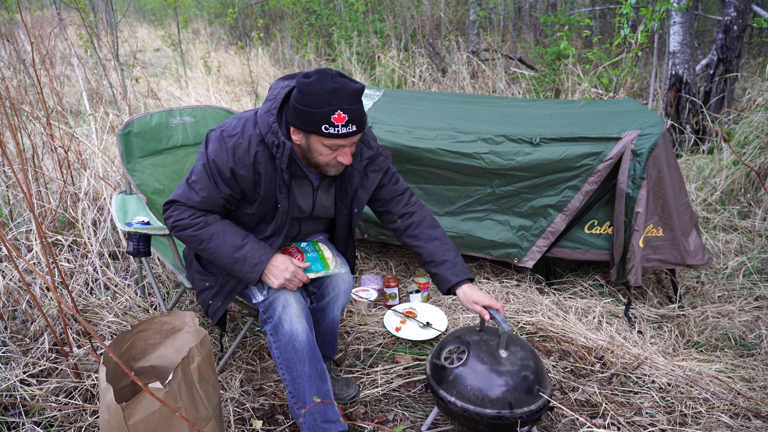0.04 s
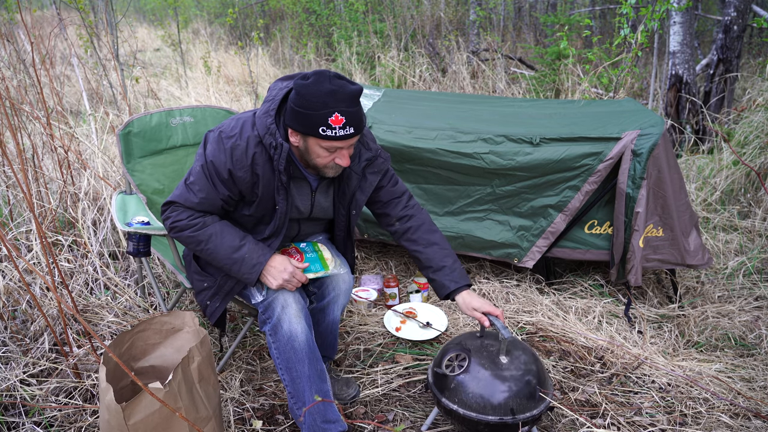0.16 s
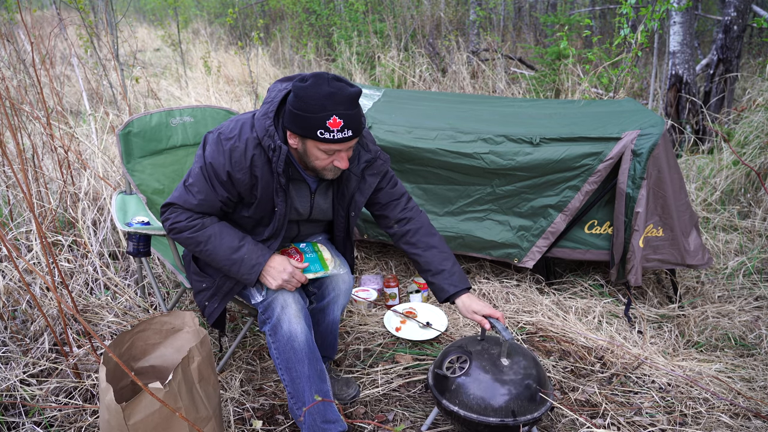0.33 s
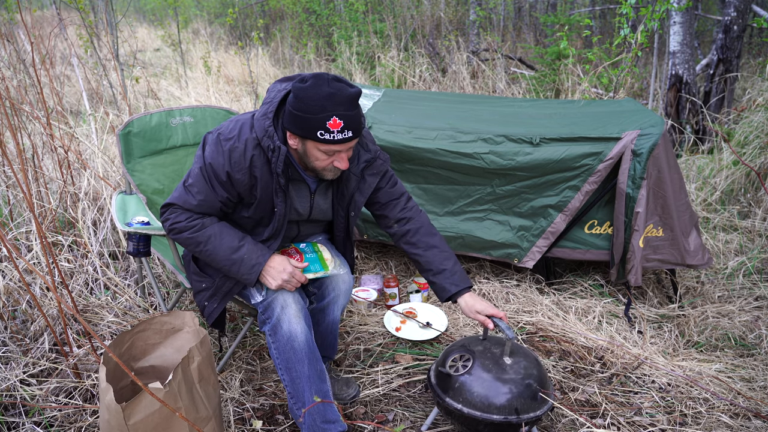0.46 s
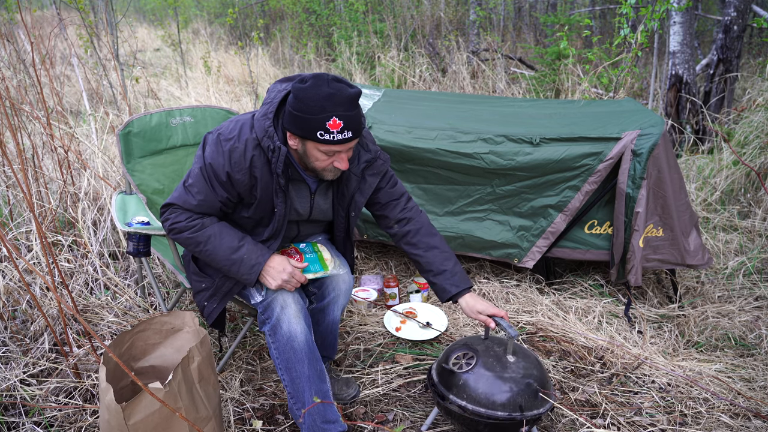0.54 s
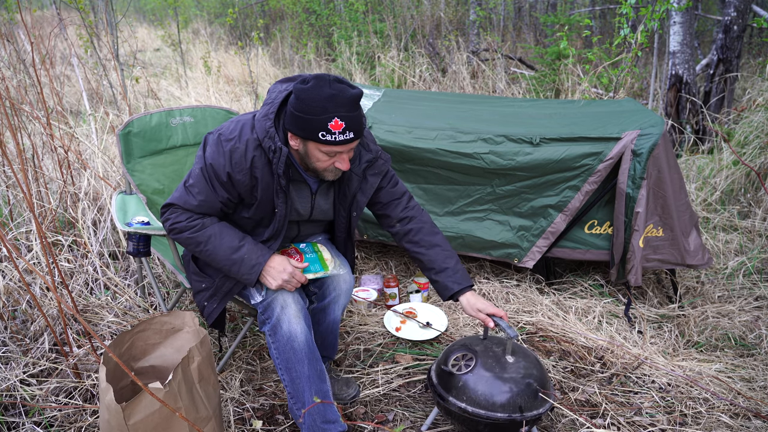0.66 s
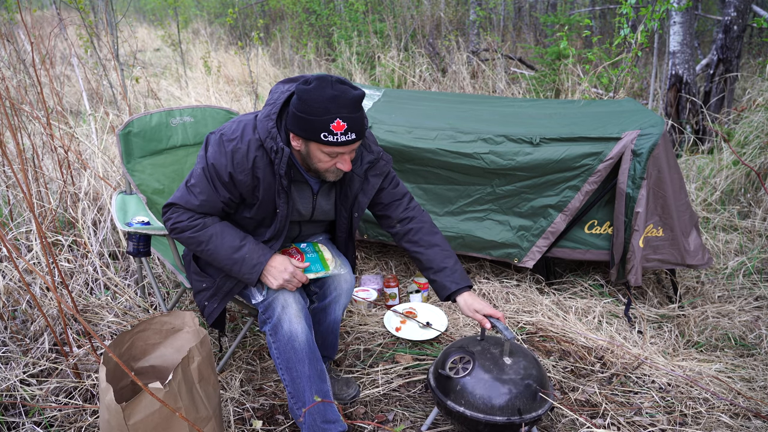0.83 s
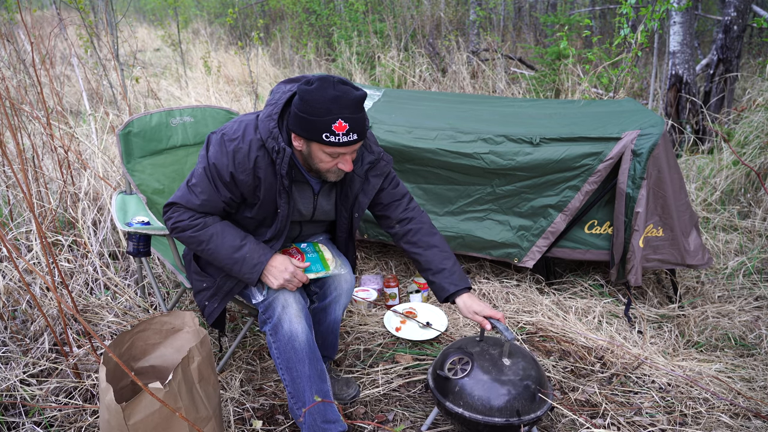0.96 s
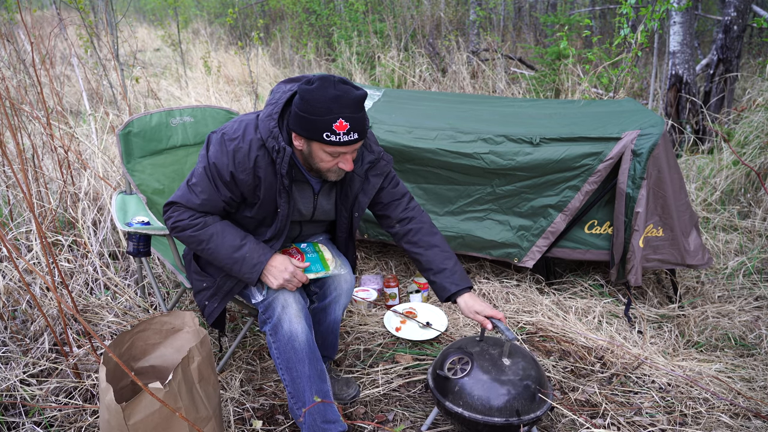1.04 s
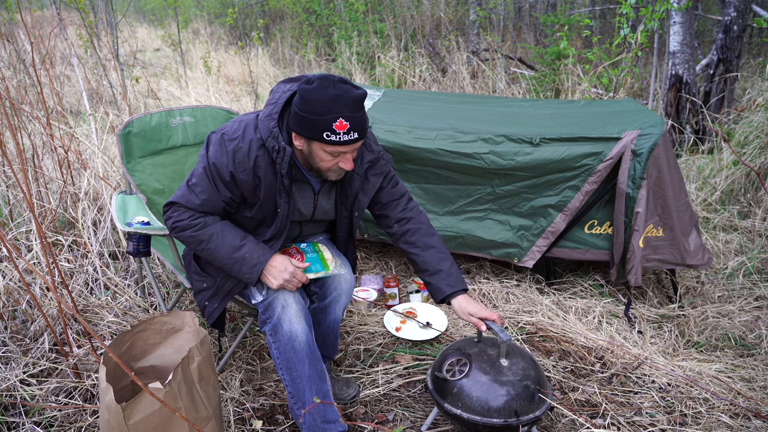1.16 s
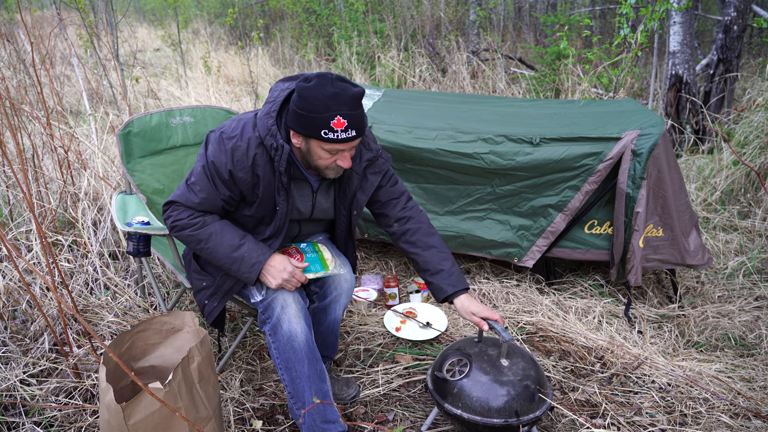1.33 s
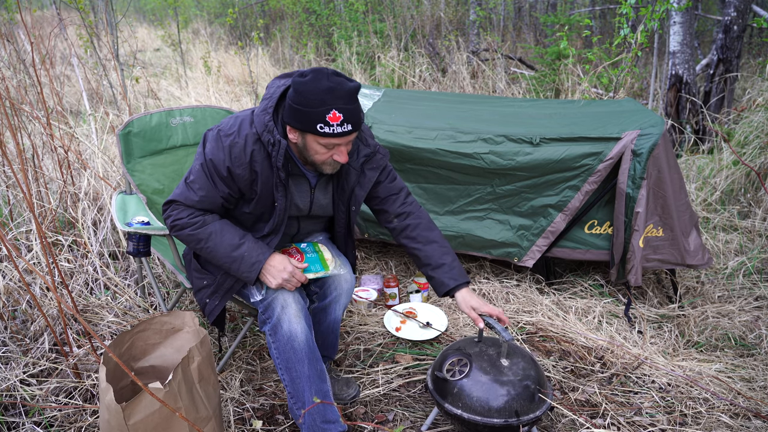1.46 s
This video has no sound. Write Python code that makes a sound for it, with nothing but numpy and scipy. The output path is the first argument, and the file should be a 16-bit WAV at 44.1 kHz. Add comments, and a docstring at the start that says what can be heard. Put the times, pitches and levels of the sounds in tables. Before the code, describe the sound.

A domed metal lid clanks onto a small charcoal grill at about 0.2 seconds, close by, with hollow clonks at 0.3 and 0.5 seconds. The rims scrape and chatter as the lid is shuffled and the grill rocks softly. Another loud clank comes near 0.9 seconds, and the lid seats with a last one at 1.2 seconds. A faint breeze stirs dry grass throughout.

```python
"""In a quiet clearing, a domed steel lid is set on a small charcoal grill and shuffled until it seats.
The rims scrape, chatter and clash, which drives the bending modes of the thin lid. Each time it drops
home the bowl's modes give a hollow clonk, and the grill rocks softly on its legs. Dry grass crackles
in a faint breeze, a few brief ticks sound, the trees return a weak echo, and a near microphone clips
on the hardest blows."""
import sys
import numpy as np
from scipy import signal
from scipy.fft import rfft, irfft, next_fast_len
from scipy.io import wavfile

SR = 44100
rng = np.random.default_rng(int(sys.argv[2]) if len(sys.argv) > 2 else 0)


def output_pcm(signal):
    """Save a mono or channel-first signal as 16-bit PCM at the path in sys.argv[1].

    Samples are clipped to [-1, 1] before scaling.
    """
    pcm = np.clip(np.atleast_2d(signal).T, -1, 1) * 32767
    wavfile.write(sys.argv[1], SR, np.round(pcm).astype(np.int16))


N = 66150
RING_N = SR // 2  # samples allowed for one decay
RING_T = np.arange(RING_N) / SR
TILT_HZ = 2800  # pivot of the lid's brightness

# spectral envelope of the lid's dense, weaker modes (frequency [Hz], level [dB])
LID_SPECTRUM = [(130, -10.5), (240, 6), (380, 1), (800, 1), (1300, -3), (1550, 1), (2250, 1), (2550, -3),
                (3300, 0.5), (3750, -3.5), (4400, -2.5), (7500, -6.5), (9000, -12.5), (10500, -25),
                (12500, -20), (16000, -29)]


def amp(db):
    """Amplitude ratio of a level in decibels."""
    return 10 ** (np.asarray(db) / 20)


def unit(x):
    """Normalisation to an rms of 1."""
    return x / np.sqrt(np.mean(x ** 2) + 1e-20)


def decay(t60):
    """Exponential damping: 60 dB down after t60 seconds."""
    return amp(-60 * RING_T / t60)


def along(points, hz):
    """Interpolation of (frequency, value) points on a logarithmic frequency axis."""
    freqs, values = np.transpose(points)
    return np.interp(np.log(hz + 1), np.log(freqs + 1), values)


def filtered(x, gain):
    """Zero-phase filtering: the spectrum is multiplied by gain(hz)."""
    size = next_fast_len(len(x) + SR // 10)
    return irfft(rfft(x, size) * gain(np.fft.rfftfreq(size, 1 / SR)), size)[:len(x)]


def add(out, start_s, x):
    """Superposition of x on out, from start_s onward."""
    i = round(start_s * SR)
    out[i:i + len(x)] += x[:N - i]


def breeze(crackles_per_s=250, crackle_db=-8.5):
    """Broadband air noise and random impulses from dry grass share one spectrum and envelope."""
    # spectrum of the breeze (frequency [Hz], level [dB])
    spectrum = [(20, -2), (70, -9), (150, -14.5), (280, -8.5), (600, -9), (1100, -16.5), (3500, -19),
                (8000, -24.5), (10000, -32), (16000, -32.5)]
    # envelope of the breeze (time [s], level [dB])
    envelope = [(0, -48.5), (.16, -50.5), (.7, -48), (1.1, -53), (1.38, -55), (1.45, -49), (1.5, -49)]
    colour = lambda x: unit(filtered(x, lambda hz: amp(along(spectrum, hz))))
    crackle = (rng.random(N) < crackles_per_s / SR) * rng.standard_normal(N)
    gain = amp(np.interp(np.arange(N) / SR, *np.transpose(envelope)))
    return gain * (colour(rng.standard_normal(N)) + amp(crackle_db) * colour(crackle))


def brief_ticks(t60=0.0084):
    """Transients of damped noise: faint dry clicks nearby and one bright tick of the lid."""
    # ticks (time [s], level [dB], band centre [Hz])
    ticks = [(0.0468, -32.5, 1150), (.079, -45, 1600), (0.147, -46, 2800), (1.018, -42, 7100)]
    out = np.zeros(N)
    for start_s, db, centre in ticks:
        noise = filtered(rng.standard_normal(RING_N), lambda hz: hz * centre / (hz ** 2 + centre ** 2))
        add(out, start_s, amp(db) * unit(noise) * decay(t60))
    return out


def lid_ring(force, brightness, focus_hz, modes_db, focus_db=4.5, focus_octaves=0.085, rim_hz=3870):
    """Forced response: the contact force is convolved with the lid's distinct and dense modes."""
    # distinct modes of the lid (frequency [Hz], level [dB], T60 [s])
    lid_modes = [(1537, -2, .14), (1611, -2, .14), (1753, -5, .16), (1900, -3, .13), (1960, -2, .17),
                 (2160, -1, .17), (2215, -1, .12), (2268, 1, .18), (2896, -5, .2), (3330, -1, .1),
                 (3445, -4, .13), (4137, -4, .1), (4552, -10, .13), (5440, -7, .08), (6790, -6, .08)]
    # damping of the dense modes (frequency [Hz], T60 [s])
    dense_t60 = [(250, 0.096), (900, 0.077), (1900, 0.15), (5000, 0.16), (12000, 0.081)]

    def excitation(hz):
        """Hard contact favours the treble and the stiff rim; its place favours modes near focus_hz."""
        octaves = np.log2(np.clip(hz, 2100, 5000) / TILT_HZ)
        rim_step = 0.45 * np.tanh((hz - rim_hz) / 350)
        focus = np.exp(-(np.log2((hz + 1) / focus_hz) / focus_octaves) ** 2)
        return amp(brightness * (octaves + rim_step) + focus_db * focus)

    driven = lambda response: unit(signal.fftconvolve(force, response)[:RING_N])
    hz = np.fft.rfftfreq(RING_N, 1 / SR)
    spectrum = rfft(rng.standard_normal(RING_N)) * amp(along(LID_SPECTRUM, hz)) * excitation(hz)
    edges = np.geomspace(60, SR / 2, 13)
    dense, distinct = np.zeros((2, RING_N))
    for low, high in zip(edges, edges[1:]):
        band = irfft(spectrum * ((hz >= low) & (hz < high)))
        dense += band * decay(along(dense_t60, np.sqrt(low * high)))
    for mode_hz, db, t60 in lid_modes:
        gain = amp(db + rng.normal(0, 3.6)) * excitation(mode_hz)
        mode = np.sin(2 * np.pi * (mode_hz * RING_T + rng.random())) * decay(t60)
        distinct += gain * driven(mode)
    ring = driven(dense) + amp(modes_db) * unit(distinct)
    return unit(ring) / np.sqrt(RING_N)  # unit energy


def rim_scrapes(slips_per_s=1500, scatter_db=5):
    """Stick-slip friction: tiny uneven slips keep the lid ringing while it slides."""
    # rim sliding on rim (time [s], duration [s], start level [dB], end level [dB],
    # brightness [dB/octave], favoured frequency [Hz])
    slides = [(0.179, 0.0069, -35, -34, -3, 2196), (0.185, 0.074, -30, -33, -0.5, 3360),
              (.255, 0.059, -37.5, -19.5, -3, 1570), (0.306, 0.032, -30, -26, -2.5, 3500),
              (0.437, .03, -36, -27.5, 2, 2860), (.476, 0.14, -27, -41, -3, 2050),
              (0.659, 0.071, -49, -46, -2, 2200), (0.715, 0.28, -40.5, -40.5, -1, 1930),
              (0.853, 0.0072, -26, -24, 1, 7600), (.865, 0.056, -28.5, -20.5, 0.5, 3830),
              (0.93, .024, -32.5, -17.5, -2.5, 2120), (0.962, 0.068, -30, -40.5, -4.5, 1927),
              (1.067, 0.017, -46.5, -50, 7, 3380), (1.133, 0.032, -44, -43, -4, 3400),
              (1.159, 0.046, -24.5, -32, 1.5, 2240), (1.2, 0.048, -16, -37, -3, 2330),
              (1.246, 0.048, -67, -59, 6, 2270)]
    out = np.zeros(N)
    for start_s, length_s, start_db, end_db, brightness, focus_hz in slides:
        slipping = rng.random(RING_N) < slips_per_s / SR
        direction, size = rng.standard_normal((2, RING_N))
        slips = slipping * np.sign(direction) * amp(scatter_db * size)
        n = max(int(length_s * SR), SR // 200)
        pressure = amp(np.linspace(start_db, end_db, n))
        ring = lid_ring(unit(slips[:n]) * pressure, brightness, focus_hz, modes_db=-4.5)
        add(out, start_s, np.linalg.norm(pressure) * ring)
    return out


def bowl_clonks():
    """Modal superposition: where the lid lands decides how strongly each bowl mode answers."""
    # hollow modes of the bowl under the lid (frequency [Hz], T60 [s])
    bowl_modes = [(208, 0.074), (278, .06), (385, 0.052), (455, 0.025), (580, 0.04), (708, 0.064),
                  (820, 0.069)]
    # landings of the lid (time [s], then one level [dB] for each bowl mode)
    landings = [(.2285, -31, -25, -20.5, -15.5, -43, -33.5, -30),
                (.3023, -12.5, -15, -6, -51, -44, -15.5, -54), (.4700, -29, -6, -20.5, -7, -13.5, -8, -55),
                (.9323, -18, -22.5, -19.5, -32, -19, -35, -8.5),
                (1.2013, -8, -17, -11.5, -6, -23, -16, -17.5)]
    out = np.zeros(N)
    for start_s, *levels in landings:
        for db, (hz, t60) in zip(levels, bowl_modes):
            add(out, start_s, -amp(db) * np.cos(2 * np.pi * hz * RING_T) * decay(t60))
    return out


def bowl_radiation(vibration, contact_hz=926, corner_hz=218, q=1.34):
    """Soft contact drives little treble, and a small bowl radiates little below its lowest mode."""
    softened = signal.sosfilt(signal.butter(3, contact_hz, fs=SR, output='sos'), vibration)
    omega = 2 * np.pi * corner_hz
    highpass = signal.bilinear([1, 0, 0], [1, omega / q, omega ** 2], SR)
    return signal.lfilter(*highpass, softened)


def rim_clashes(rise_s=0.0013, snap_db=-10, snap_t60=0.018):
    """Impulse response: rim strikes rim with a short snap, then the lid rings freely."""
    # strikes (time [s], level [dB], brightness [dB/octave], distinct over dense modes [dB],
    # favoured frequency [Hz])
    strikes = [(0.2292, -11, 5.5, -2.5, 4270), (.3030, -20, -8, 4, 1600), (.414, -31.5, -3.5, 4, 2230),
               (.4700, -20, -3, -9.5, 2800), (.653, -35, -7, -3.5, 1800), (0.9323, -16.5, -5, -3, 1090),
               (1.129, -37, -2.5, -10, 2180), (1.1545, -25.5, 5, -14, 7200)]
    snap_colour = lambda hz: amp(along(LID_SPECTRUM, hz) / 2) * hz / (hz + TILT_HZ)
    attack = 1 - np.exp(-RING_T / rise_s)
    out = np.zeros(N)
    for start_s, db, brightness, modes_db, focus_hz in strikes:
        noise = unit(filtered(rng.standard_normal(RING_N), snap_colour))
        snap = amp(snap_db + brightness) * decay(snap_t60) * noise
        ring = lid_ring(np.ones(1), brightness, focus_hz, modes_db)
        ring /= np.std(ring[:SR // 100])  # the first 10 ms set the level
        add(out, start_s, amp(db) * (snap + ring) * attack)
    return out


def bowl_rocking(rise_s=0.0018, t60=0.071):
    """Damped oscillation: the bowl rocks on its legs, each soft bump sounding one low tone."""
    # bumps (time [s], level [dB], frequency [Hz])
    bumps = [(0.288, -28, 320), (.420, -33, 240), (.508, -22.5, 233), (0.564, -28, 260.5), (.725, -28, 256),
             (0.802, -31.5, 297), (0.849, -23.5, 254), (.875, -22.5, 220), (0.9, -21, 231),
             (.941, -12, 208), (1.016, -27.5, 218), (1.16, -26, 254)]
    envelope = decay(t60) * (1 - np.exp(-RING_T / rise_s))
    out = np.zeros(N)
    for start_s, db, hz in bumps:
        add(out, start_s, amp(db) * np.sin(2 * np.pi * hz * RING_T) * envelope)
    return out


def tree_echo(direct, level_db=-26, t60=0.47):
    """Reverberation: scattering from the trees adds a faint, decaying tail."""
    tail = rng.standard_normal(RING_N) * decay(t60)
    return amp(level_db) * signal.fftconvolve(direct, tail / np.linalg.norm(tail))[:N]


def scene():
    """Superposition of the grill, its echo and the clearing, in one channel."""
    grill = rim_clashes() + rim_scrapes() + bowl_radiation(bowl_clonks() + bowl_rocking())
    return (grill + tree_echo(grill) + breeze() + brief_ticks())[None]


def record(dry, top_hz=15900):
    """Overload and band limiting: peaks clip at full scale, then all above top_hz is removed."""
    return filtered(np.clip(dry[0], -1, 1), lambda hz: hz < top_hz)[None]


dry = scene()
out = record(dry)
output_pcm(out)
```